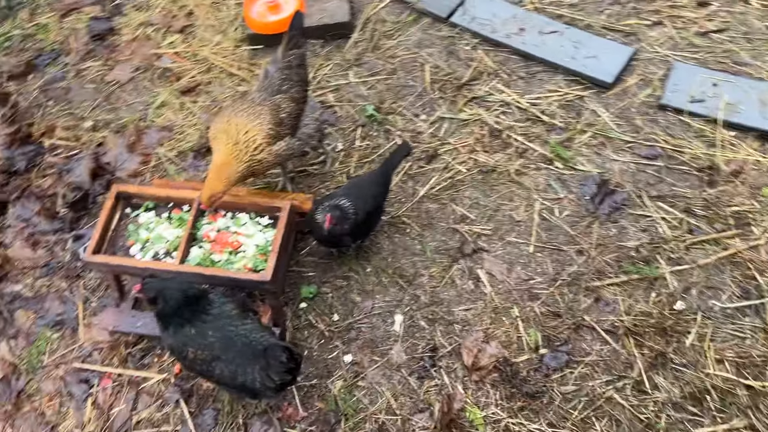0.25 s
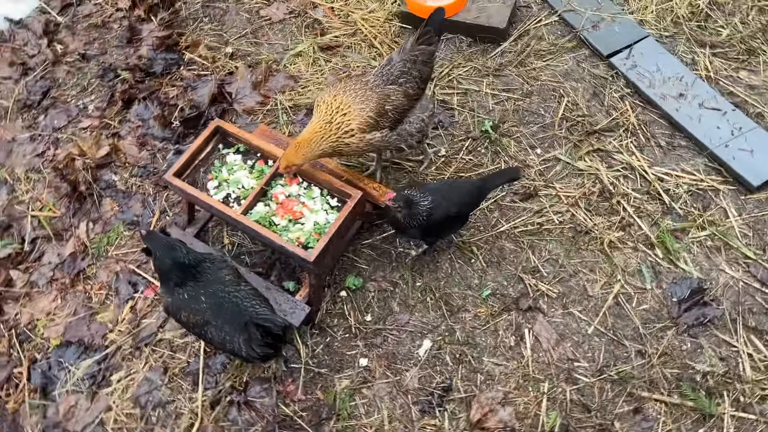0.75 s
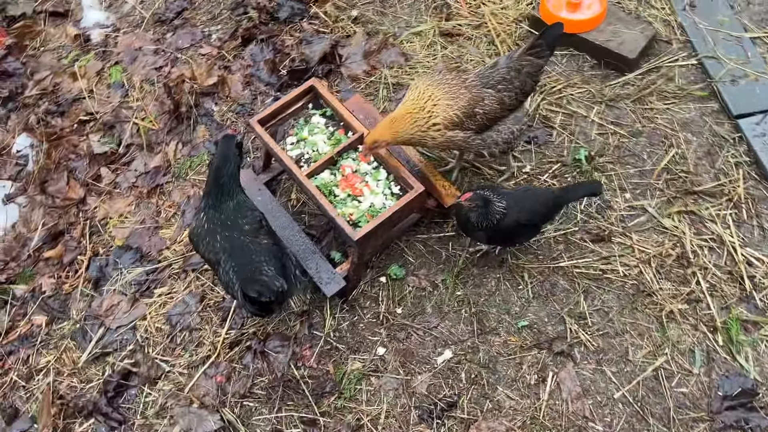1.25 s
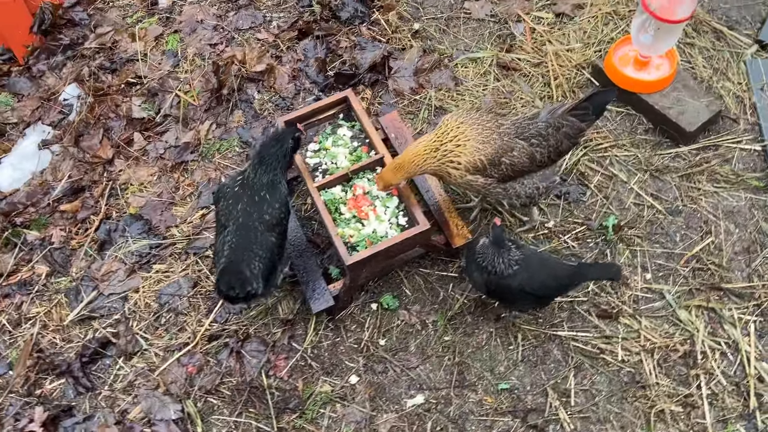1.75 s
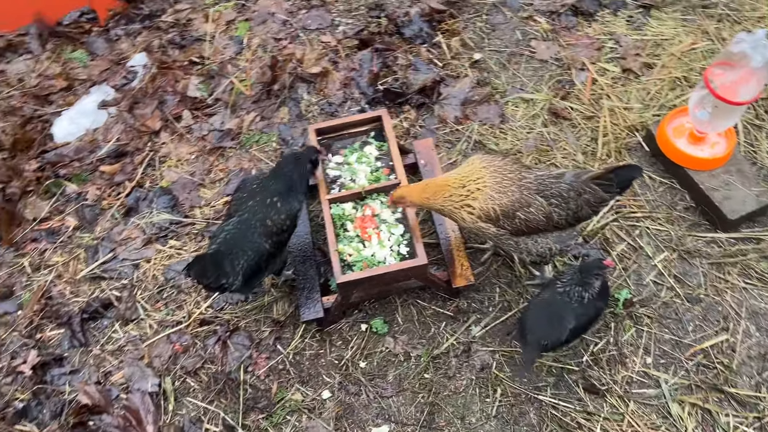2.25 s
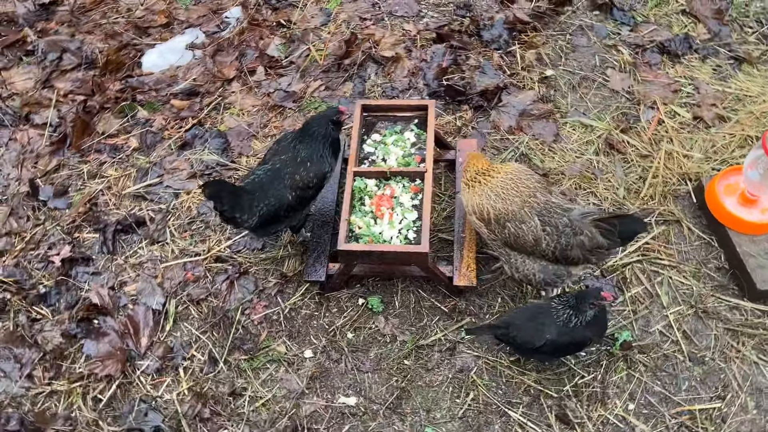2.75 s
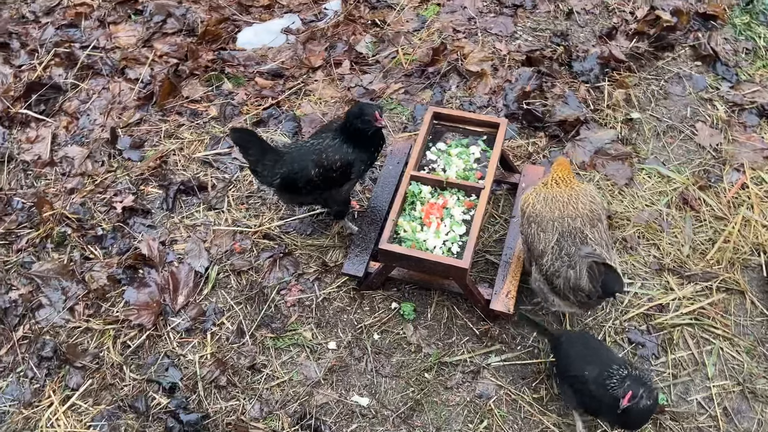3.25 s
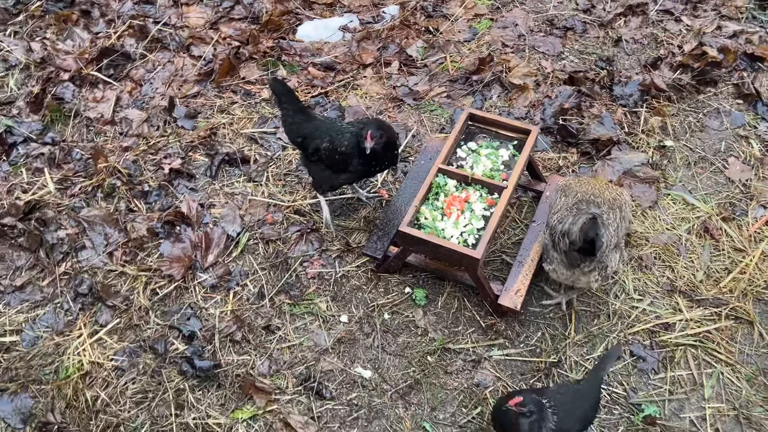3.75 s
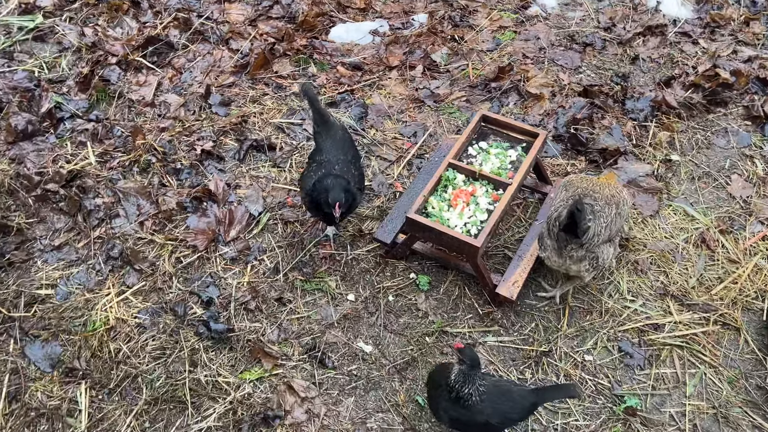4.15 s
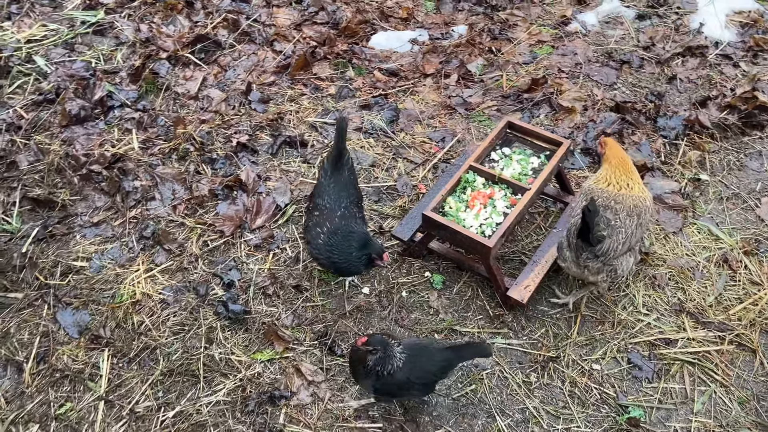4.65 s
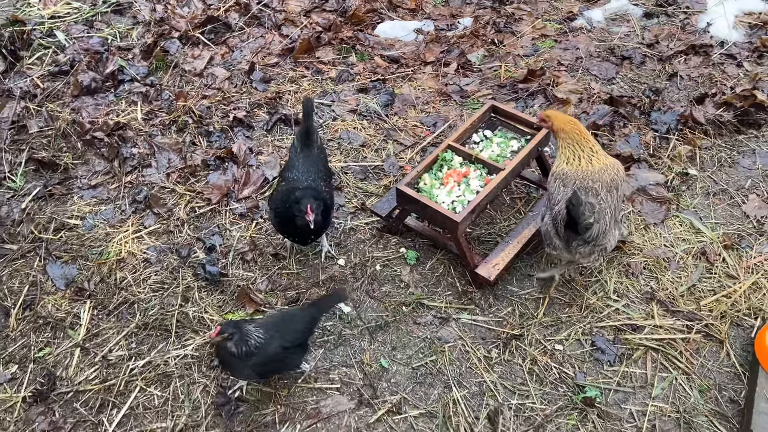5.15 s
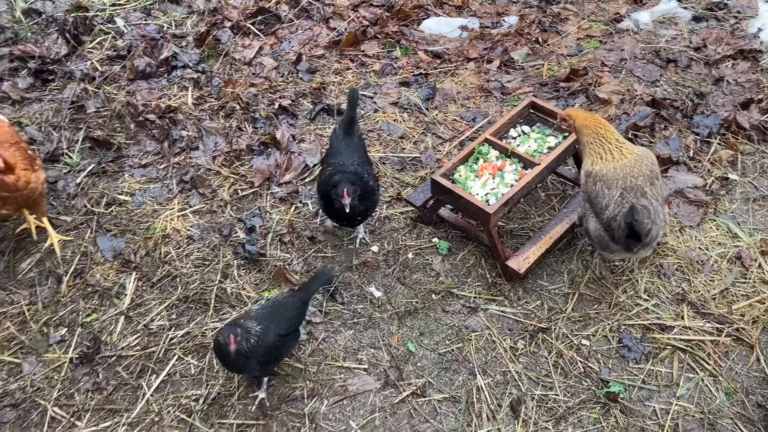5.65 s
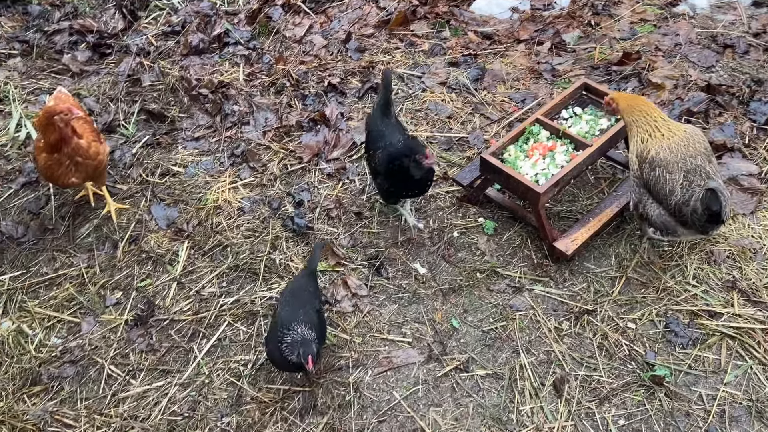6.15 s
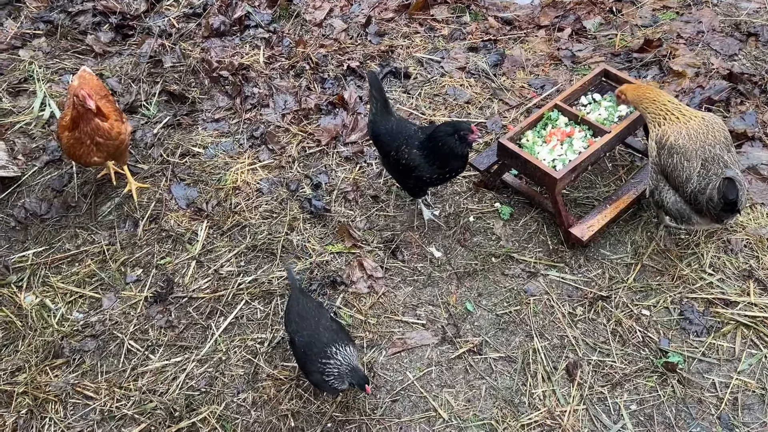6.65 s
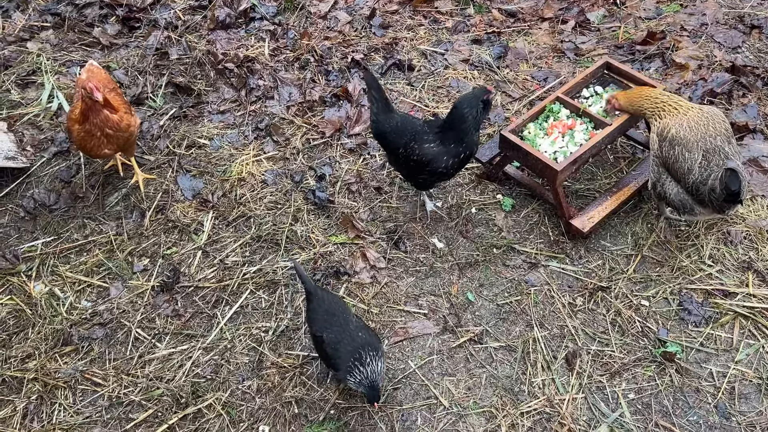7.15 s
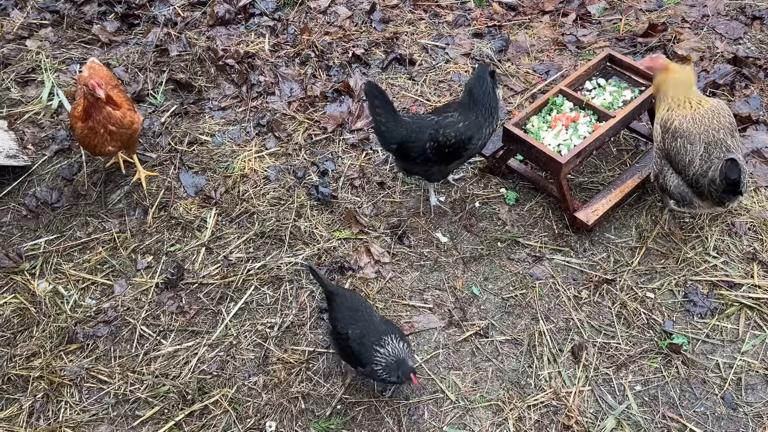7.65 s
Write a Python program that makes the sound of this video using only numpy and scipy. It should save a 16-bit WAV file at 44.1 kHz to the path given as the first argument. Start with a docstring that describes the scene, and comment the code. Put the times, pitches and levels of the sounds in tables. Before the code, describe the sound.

Open yard, close hand-held stereo microphone, almost no echo; a low, slightly unsteady rumble and soft wash run throughout. Faint straw ticks and foot pats come first. At 0.9 s a hen gives a low rising caw that flips into a thin, high whine, cracking early, climbing and stopping at 1.9; a sharp wooden beak knock lands at 1.0. A straw tick at 1.5 and a foot pat at 2.1 precede a pause. Around 3.5 comes a dull thump with pats and a brief rustle. At 4.3 a hoarse caw leads to a faint, rough whine with a soft distant moan, swelling from 4.9 to 5.8 with quick pitch breaks. Muffled gusts bump from 5.4 to 6.6. Caws at 6.1 burst into the loudest, snarling, cracking whine until 6.9. More gusts accompany a low, rising drawl from 7.4 to 7.9, with a tiny high peep at the end.

```python
"""Hens squawk at a feeder in an open yard, close to a hand-held microphone with two ports.
A squawk starts as low caws, most of them rising, and breaks into a thin, high whine whose pitch keeps cracking;
the last stays low, a long drawl. Each voice is a vibrating membrane: harmonics, half-way lines and rasp.
A beak knocks on the feeder (dying modes), feet pat, straw ticks and rustles (shaped noise puffs). One dull thump,
then gusts on the microphone (low noise swells) stand over a low outdoor rumble (coloured noise and a drone)."""
import sys
import numpy as np
from scipy import signal
from scipy.fft import rfft, irfft, next_fast_len
from scipy.io import wavfile

SR = 44100
rng = np.random.default_rng(int(sys.argv[2]) if len(sys.argv) > 2 else 0)


def unload_audio(sound):
    """Save the sound as a 16-bit wav file, at the path given as the first command line argument."""
    columns = np.transpose(np.atleast_2d(sound))
    # keep every value between -1 and 1, then stretch to whole-number steps
    steps = np.round(np.clip(columns, -1, 1) * 32767)
    wavfile.write(sys.argv[1], SR, steps.astype(np.int16))


N = 347949  # length in samples


def amp(db):
    """Decibels to gain."""
    return 10 ** (np.asarray(db) / 20)


def evened(x):
    """Scales to rms 1."""
    return x / np.sqrt(np.mean(x ** 2) + 1e-20)


def read(points, hz):
    """Reads a spectrum on a log-frequency axis."""
    f, value = np.transpose(points)
    return np.interp(np.log(hz + 1), np.log(f + 1), value)


def shaped(x, gain):
    """Filters x by a gain that is a function of frequency."""
    size = next_fast_len(x.shape[-1] + 2048)
    spectrum = rfft(x, size) * gain(np.fft.rfftfreq(size, 1 / SR))
    return irfft(spectrum, size)[..., :x.shape[-1]]


def coloured(points, size):
    """Noise of rms 1 with the given spectrum."""
    return evened(shaped(rng.standard_normal(size), lambda f: amp(read(points, f))))


def wobble(hz, size):
    """Random motion of rms 1, mostly slower than hz."""
    return evened(shaped(rng.standard_normal(size), lambda f: 1 / (1 + (f / hz) ** 4)))


def add(mix, s, sound):
    """Mixes a sound in at time s."""
    part = mix[max(round(s * SR), 0):][:len(sound)]
    part += sound[:len(part)]


def controls(rows):
    """Time and the columns of a call, sample by sample."""
    s, *columns = np.transpose(rows)
    t = np.arange(s[0], s[-1], 1 / SR)
    return t, *(np.interp(t, s, column) for column in columns)


def spell(t, middle, half_length, edge=3):
    """A brief, flat-topped swell from 0 to 1 and back; a higher edge is squarer."""
    return np.exp(-np.minimum(abs((t - middle) / half_length), 10) ** edge)


# spectrum of the outdoor noise: (frequency [Hz], relative density [dB per Hz])
AIR_COLOUR = [(30, -19), (52, -4), (66, 0), (85, -4), (125, -10), (200, -19.5), (400, -25), (750, -19),
              (1400, -25.5), (2200, -33), (5000, -37), (8500, -48), (15500, -54)]
# slow course of the outdoor noise: (time [s], level [dB])
AIR_LEVEL = [(0, -41), (5.6, -41), (6, -43), (6.8, -40.5), (7.1, -43.5), (7.5, -41)]
# likeness of the outdoor noise in the two ports: (frequency [Hz], likeness [0-1])
AIR_LIKENESS = [(60, .85), (700, .8), (5000, .6), (9000, .95)]


def air():
    """Far rumble, a soft wash and an unsteady 60 Hz drone; how alike the ports are depends on frequency."""
    def same(f):
        return np.clip(read(AIR_LIKENESS, f), 0, 1)

    mid = shaped(coloured(AIR_COLOUR, N), lambda f: np.sqrt((1 + same(f)) / 2))
    side = shaped(coloured(AIR_COLOUR, N), lambda f: np.sqrt((1 - same(f)) / 2))
    drone_hz = 60.0 + 3.4 * wobble(7.5, N)
    drone = amp(-25.0) * np.sin(2 * np.pi * np.cumsum(drone_hz) / SR) * (1 + 0.81 * wobble(2.5, N))
    level_db = np.interp(np.arange(N) / SR, *np.transpose(AIR_LEVEL)) + .8 * wobble(14, N)
    return np.array([mid + side + drone, mid - side + drone]) * amp(level_db)


# low thumps: one dull thump, then gusts on the microphone:
# (middle [s], half length [s], level before an 8 dB cut [dB], edge that scales the band [Hz])
LOW_THUMPS = [(3.538, 0.029, -34.5, 290), (5.482, 0.088, -19.5, 117.4), (5.646, 0.13, -24, 136),
              (5.93, 0.14, -26.5, 114), (6.04, 0.034, -19.5, 212), (6.126, 0.064, -26.5, 367),
              (6.382, 0.047, -24.5, 276), (6.474, .01, -29, 557), (6.5, 0.22, -31.5, 230),
              (7.248, 0.031, -30, 242), (7.342, 0.068, -32, 208), (7.516, 0.06, -29.5, 286),
              (7.595, 0.051, -28.5, 318)]


def low_thumps():
    """One dull thump, then gusts on the microphone: swells of low noise in a band scaled by each edge."""
    out = np.zeros(N)
    for middle, half_length, db, edge_hz in LOW_THUMPS:
        size = int(2 * half_length * SR)

        def band(f):
            above_bottom = f ** 4 / (f ** 4 + (.33 * edge_hz) ** 4)
            return above_bottom / (1 + (f / (.75 * edge_hz)) ** 3)

        swell = shaped(rng.standard_normal(size), band)
        add(out, middle - half_length, amp(db - 8.0) * evened(swell * np.hanning(size)))
    return out


# soft clean notes, one curve each, a low moan and a thin peep: (time [s], pitch [Hz], level [dB])
FAR_NOTES = [
    [(4.48, 431, -55), (4.6, 455, -48.5), (4.78, 430, -49.5)],
    [(7.795, 6000, -46), (7.85, 5010, -59), (7.889, 4670, -40)],
]


def notes():
    """Quiet, nearly pure tones from farther off: sines with a slightly unsteady pitch."""
    out = np.zeros(N)
    for rows in FAR_NOTES:
        t, hz, db = controls(rows)
        phase = 2 * np.pi * np.cumsum(hz * (1 + 0.0022 * wobble(60, len(t)))) / SR
        add(out, t[0], amp(db) * evened(np.sin(phase)) * signal.windows.tukey(len(t), .2))
    return out


# litter rustling under a step: (middle [s], half length [s], level [dB], centre [Hz], width [octaves])
RUSTLES = [(3.56, .045, -50, 1900, .25), (4.79, .12, -58, 5200, .55)]
RUSTLE_GRAINS_PER_S = 2500


def rustles():
    """Straw and leaves: many tiny snaps crowd together as a foot presses the litter."""
    out = np.zeros(N)
    for middle, half_length, db, centre_hz, octaves in RUSTLES:
        size = int(2 * half_length * SR)
        snaps = rng.standard_normal(size) * (rng.random(size) < RUSTLE_GRAINS_PER_S / SR)
        crackle = shaped(snaps, lambda f: np.exp(-.5 * (np.log2((f + 1) / centre_hz) / octaves) ** 2))
        add(out, middle - half_length, amp(db) * evened(crackle) * np.hanning(size))
    return out


# clear straw ticks: (time [s], peak level [dB])
CLEAR_TICKS = [(0.154, -43), (1.517, -29), (3.596, -37), (7.053, -38)]
# spectrum of a tick: (frequency [Hz], level [dB])
TICK_COLOUR = [(300, -20), (2000, -3), (6000, 0), (15000, -3)]


def straw():
    """Stalks snap under the hens' feet: a few clear ticks among many tiny ones."""
    out, t = np.zeros(N), np.arange(SR // 30) / SR
    tiny = [(place * N / SR, -58 + 12 * u ** 2) for place, u in rng.random(size=(90, 2))]
    for s, db in list(CLEAR_TICKS) + tiny:
        tick = coloured(TICK_COLOUR, len(t)) * np.exp(-t / .0013)
        add(out, s, amp(db) * tick / abs(tick).max())
    return out


# feet patting the packed earth: (time [s], peak level [dB])
FOOT_PATS = [(0.047, -33), (2.087, -34), (3.522, -30), (3.544, -32), (3.698, -31)]
# spectrum of a pat: (frequency [Hz], level [dB])
PAT_COLOUR = [(150, -9), (650, 0), (1100, -5), (2200, -19), (6000, -38)]
PAT_DECAY_S = .006


def feet():
    """A foot comes down on the earth: a dull puff with no ring."""
    out, t = np.zeros(N), np.arange(SR // 12) / SR
    for s, db in FOOT_PATS:
        pat = coloured(PAT_COLOUR, len(t)) * np.exp(-t / PAT_DECAY_S)
        add(out, s, amp(db) * pat / abs(pat).max())
    return out


# beak blows on the feeder: (time [s], peak level [dB])
BEAK_BLOWS = [(1.0093, -8), (1.024, -26)]
# modes of the feeder: (frequency [Hz], relative level [dB], time to fall 60 dB [s])
FEEDER_MODES = [(970, -12, 0.085), (2340, -7, 0.13), (2700, -14, 0.04), (3224, 5.5, 0.054),
                (5680, 10, 0.011), (8080, 5, 0.01)]


def pecks():
    """A beak strikes the feeder: a short crunch and a few dying modes."""
    out, t = np.zeros(N), np.arange(SR // 8) / SR
    crunch_colour = [(300, -21), (2000, -4.0), (3500, -3), (6000, -9), (9000, -23.5), (15000, -20)]  # (Hz, dB)
    for s, db in BEAK_BLOWS:
        ring = sum(amp(mode_db - 60 * t / t60) * np.sin(2 * np.pi * (hz * t + rng.random()))
                   for hz, mode_db, t60 in FEEDER_MODES)
        crunch = coloured(crunch_colour, len(t)) * (np.exp(-t / .0035) + .08 * np.exp(-t / .012))
        attack = 1 - np.exp(-(t / .0008) ** 2)
        blow = (ring + 2.2 * crunch) * attack
        add(out, s, amp(db) * blow / abs(blow).max())
    return out


# spells in which strong and weak cycles alternate: (middle [s], half length [s], rise of the half-way lines [dB])
DOUBLINGS = [(4.278, .015, 24), (5.535, .035, 19), (5.682, .03, 26), (5.785, .015, 17), (6.28, .025, 13),
             (6.41, .015, 16), (7.42, .02, 14), (7.495, .06, 20), (7.85, .08, 26)]
HALF_DB, HALF_ROUGH_DB = -30, 24  # setting for a clean voice, and its rise per unit of roughness


def doubling(t, rough):
    """Setting in dB for the lines half-way between the harmonics, raised when cycles alternate."""
    rise = sum(rise_db * spell(t, s, length) for s, length, rise_db in DOUBLINGS)
    return HALF_DB + HALF_ROUGH_DB * rough + rise


EDGE_HZ = 15800  # upper band limit
FLUTTER_HZ = 55  # rate of the quick sags of tension
FRAY_HZ, FRAY_DB = 170, 5  # frayed overtones slip in phase at this rate and break up
OVERTONE_FLICKER_DB = 4  # each overtone comes and goes on its own
BURST_DB, BURSTS_PER_S = 4, 30  # rasp comes in bursts
PATCHY_DB = 6  # a fully rough voice comes and goes by up to this much


def syrinx(hz, octave_db, overtone_db, half_db, rough, throat, rasp_colour, fray, flutter, rasp_db):
    """A vibrating membrane: fundamental, octave, fraying overtones, lines half-way between, and rasp."""
    size, rough = len(hz), np.clip(rough, 0, 1)
    sag = abs(wobble(FLUTTER_HZ, size)) - np.sqrt(2 / np.pi)
    hz = hz * (1 - flutter * np.sqrt(rough) * sag + .04 * rough * wobble(520, size))
    phase = 2 * np.pi * np.cumsum(hz) / SR
    frayed = fray * (.4 + 1.5 * np.sqrt(rough))

    def partial(k, slip=0):
        start = rng.uniform(0, 2 * np.pi)
        return np.sqrt(2) * np.cos(k * phase + slip + start) * (k * hz < EDGE_HZ)

    def broken(k):
        slip = frayed * min(k / 4, 3) * wobble(FRAY_HZ, size)
        return partial(k, slip) * amp(FRAY_DB * frayed * (wobble(FLUTTER_HZ, size) - .5))

    def through(k):  # a broken partial after the throat
        return broken(k) * amp(read(throat, k * hz) + OVERTONE_FLICKER_DB * wobble(10.3, size))

    def smear():  # unequal cycles smear each overtone
        return 1 + 2.2 * rough * wobble(300, size)

    def torn(k):
        return partial(k) * wobble(.3 * hz.mean(), size) * amp(BURST_DB * wobble(BURSTS_PER_S, size))

    core = partial(1) + amp(octave_db) * broken(2) * (1 + rough * wobble(250, size))
    upper = amp(overtone_db) * sum(through(k) * smear() for k in range(3, 24))
    halves = amp(half_db + overtone_db / 2 - 3) * sum(through(k + .5) for k in range(1, 8))
    # noise fills the gaps between the harmonics
    gap_noise = sum(torn(k + .5) for k in range(1, 22))
    rasp = evened(shaped(gap_noise, lambda f: amp(read(rasp_colour, f)))) * rough * amp(rasp_db)
    shimmer_db = np.sqrt(rough) * (2.3 * wobble(130, size) - 3 * sag)
    patches_db = PATCHY_DB * rough ** 2 * np.tanh(wobble(25, size))
    fade = signal.windows.tukey(size, min(1, .012 * SR / size))
    return (core + upper + halves + rasp) * amp(shimmer_db + patches_db) * fade


# colour of the overtones in a caw: (frequency [Hz], gain [dB])
CAW_THROAT = [(1050, 7), (1300, 24), (1900, 17), (2450, 9), (2900, -20), (3300, 4.5), (4800, 8.5),
              (7000, 5), (9000, -13.5), (12500, -6.5), (15500, -19)]
# noise of the unsteady membrane in a caw: (frequency [Hz], relative level [dB])
CAW_RASP = [(700, -16.5), (1350, -2), (1950, 15.5), (2300, 5), (2900, -34), (4800, -14), (8000, -32)]
CAW_FRAY, CAW_FLUTTER = .33, .025  # overtone fraying [radians], sag of tension [share of the pitch]


def caw_voice(t, hz, octave_db, overtone_db, rough, rasp_db):
    """The low register, whose octave lies on the main throat resonance."""
    return syrinx(hz, octave_db, overtone_db, doubling(t, rough), rough,
                  CAW_THROAT, CAW_RASP, CAW_FRAY, CAW_FLUTTER, rasp_db)


# the drawl: (time [s], pitch [Hz], level [dB], octave [dB], overtones [dB], roughness [0-1])
DRAWL = [(7.357, 628, -37, 7.5, -29.5, 0.14), (7.425, 686, -38, 0.5, -37, 0.42),
         (7.465, 714, -35, 0.5, -41, 0.1), (7.535, 745, -33.5, 2, -30, 0.09),
         (7.57, 797, -34.5, 11.5, -25, 0), (7.626, 802, -33, -6, -37, 0), (7.712, 799, -33, 11, -27, 0),
         (7.77, 829, -33, 1, -30.5, 0.02), (7.81, 853, -39, 7.5, -25.5, 0),
         (7.895, 892, -36.5, -5.5, -34, 0.04)]


def drawl():
    """One long call that stays in the low register."""
    out = np.zeros(N)
    t, hz, db, octave_db, overtone_db, rough = controls(DRAWL)
    add(out, t[0], amp(db) * caw_voice(t, hz, octave_db, overtone_db, rough, rasp_db=5))
    return out


# short caws: (start [s], length [s], first pitch [Hz], last pitch [Hz], mid-length level [dB],
# octave [dB], overtones [dB], roughness once clear [0-1])
CAWS = [(0.858, 0.11, 565, 737, -37, -1.5, -31.5, 0.14), (1.065, 0.036, 890, 860, -47, 6, -23, 0.07),
        (4.268, 0.17, 563, 668, -40.5, -2, -73, 0.11), (4.422, 0.049, 762, 846, -41, 4, -68, 0.24),
        (4.857, 0.06, 856, 808, -58, 14, -19.5, 0.72), (5.793, 0.017, 950, 905, -46.5, 6.5, -30, 0.8),
        (6.074, 0.04, 689, 830, -31.5, 6, -23, 0.14), (6.104, 0.047, 826, 974, -48, 11, -25, 0.64),
        (6.137, 0.078, 817, 814, -32.5, -1, -27, 0.03), (6.901, 0.039, 926, 800, -36, 8, -28.5, 0.58)]
CAW_BEND, CAW_SWELL_DB = 1.4, 4  # the pitch glides ever faster while the level swells
HOARSE, CLEAR_S = 0.18, 0.012  # extra roughness at the start of a caw, and how fast it clears


def caws():
    """Short gliding calls of the low register, hoarse at their start."""
    out = np.zeros(N)
    for start, length, first_hz, last_hz, db, octave_db, overtone_db, rough in CAWS:
        t = np.arange(0, length, 1 / SR)
        hz = first_hz + (last_hz - first_hz) * (t / length) ** CAW_BEND
        rough = rough + HOARSE * np.exp(-t / CLEAR_S)
        level_db = db + CAW_SWELL_DB * (t / length - .5)
        voice = caw_voice(start + t, hz, octave_db, overtone_db, rough, rasp_db=-5.5)
        add(out, start, amp(level_db) * voice)
    return out


# sidebands lie this share of the pitch above and below the whine, and drift by a share at a rate
SNARL_SHARE, SNARL_DRIFT, SNARL_DRIFT_HZ = .33, .07, 110
SKIRT_HZ = 190  # width of the noisy skirt that clings to the whine itself
SNARL_UPPER_DB, SNARL_LOWER_DB, SKIRT_DB = -15, -26, -8.5  # relative levels within the snarl


def snarl(hz):
    """A second vibration: unsteady sidebands and a noisy skirt around a tone of pitch hz."""
    size = len(hz)

    def tone(f, turn=0):
        return np.sqrt(2) * np.cos(2 * np.pi * np.cumsum(f) / SR + turn)

    gap = hz * (SNARL_SHARE + SNARL_DRIFT * wobble(SNARL_DRIFT_HZ, size))
    skirt = evened(tone(hz) * wobble(SKIRT_HZ, size) + tone(hz, np.pi / 2) * wobble(SKIRT_HZ, size))
    sidebands = amp(SNARL_UPPER_DB) * tone(hz + gap) + amp(SNARL_LOWER_DB) * tone(hz - gap)
    return sidebands + amp(SKIRT_DB) * skirt


# whines outside their cracks, one curve each: (time [s], pitch [Hz], level [dB], roughness [0-1])
WHINES = [
    [(0.966, 1183, -29.5, 0.25), (1.16, 1192, -29.5, 0.3), (1.22, 1155, -30.5, 0.25),
     (1.46, 1310, -25, 0.2), (1.55, 1241, -25.5, 0.22), (1.71, 1384, -27.5, 0.16),
     (1.825, 1395, -25.5, 0.01), (1.835, 1526, -26, 0.27), (1.845, 1500, -25.5, 0.3),
     (1.862, 1295, -37, 0.5)],
    [(4.47, 1117, -50, 0.15), (4.54, 1130, -41.5, 0), (4.61, 1247, -50.5, 0.5), (4.67, 1212, -46.5, 0.12),
     (4.75, 1268, -47, 0.62), (4.86, 1296, -50, 0.39), (4.96, 1348, -35, 0.09), (5.41, 1393, -31.5, 0.13),
     (5.72, 1456, -29, 0.11), (5.775, 1417, -23, 0.12), (5.803, 1308, -35, 0)],
    [(6.213, 1452, -33, 0.78), (6.232, 1093, -34, 0.06), (6.256, 1162, -30, 0.12),
     (6.26, 1333, -25.5, 0.14), (6.36, 1353, -24, 0.08), (6.395, 1440, -26.5, 0.15),
     (6.46, 1452, -23.5, 0.06), (6.81, 1500, -23.5, 0.1), (6.876, 1517, -20.5, 0.01),
     (6.88, 1293, -29, 0.15), (6.91, 1092, -27.5, 0.4)],
]
# voice of each whine at its usual level: (octave [dB], overtones [dB], rasp at full roughness [dB],
# fraying of the overtones [radians])
WHINE_VOICES = [(-28, -32, -21, .5), (-7, -5, 1, .7), (-23, -25, .5, 1.05)]
# cracks of the whine: (middle [s], half length [s], drop in pitch [Hz], change of level [dB])
CRACKS = [(1.008, 0.024, 196, -15.5), (1.076, 0.026, 229.8, -20), (1.134, 0.012, 190.6, -13.5),
          (1.175, 0.0058, 167, -7.5), (1.204, 0.0087, 100.6, -5.5), (1.544, 0.0051, 40.4, -6.5),
          (4.502, 0.028, 48.8, 4.5), (4.672, 0.022, 45.8, 7), (4.8, 0.0089, 80, 6.5),
          (4.944, 0.0052, 159, -2), (5.022, 0.0068, 207, -4.5), (5.236, 0.0094, 194, -0.5),
          (5.334, .008, 108.6, -2.5), (5.369, 0.0055, 155, -1.5), (5.734, 0.0048, 168.4, 0),
          (5.751, 0.0028, 188.3, -2), (6.31, 0.004, 130, -1.5), (6.362, 0.0048, 198, -3.5),
          (6.382, 0.0092, 194, -0.5), (6.433, 0.0071, 157, -2.5), (6.509, 0.008, 158, -2.5),
          (6.524, 0.0065, 243.5, -3.5), (6.603, 0.0044, 170, -5.5), (6.652, 0.0046, 192.2, -5),
          (6.734, 0.0052, 196, -5), (6.779, 0.0045, 252.5, -3), (6.818, 0.0024, 128, -11)]
# spells when the whine turns harsh: (middle [s], half length [s], gain of the snarl re the whine [dB])
SNARLS = [(5.68, .09, -7), (6.28, .025, 0), (6.411, .016, 2), (6.557, .027, -5), (6.68, .02, -1),
          (6.817, .018, -3), (6.895, .016, 0)]
# colour of the overtones with the beak shut, open and half open: (frequency [Hz], gain [dB])
SHUT_THROAT = [(2400, -6), (3800, 5), (4300, -5), (5700, -14), (7000, -14), (8500, -29)]
OPEN_THROAT = [(2200, -5), (3500, -5), (4200, -13.5), (4900, -14), (5500, -20), (6900, -14), (8300, -27),
               (11000, -41)]
HALF_THROAT = [(1900, 16), (2400, -11), (3500, -5), (4400, -1), (5100, -6), (6000, -19), (7000, -16),
               (8500, -30)]
# noise of the unsteady membrane, beak shut or half open, and open: (frequency [Hz], relative level [dB])
SHUT_RASP = [(800, -17), (1400, -9), (1850, -1), (2400, -1), (3200, -2), (4000, -10), (4800, -4),
             (6000, -16), (8000, -20), (15500, -35)]
OPEN_RASP = [(800, -12), (2100, 6.5), (4200, -6), (5200, -10), (6600, 1.5), (8200, -23), (15500, -31)]
USUAL_DB, PURER_DB_PER_DB = -24, 0.43  # a whine louder than usual is purer
MELLOW_DB = -31  # below this level a whine loses high overtones and rasp
FAINT_DB = -40  # below this level its octave gains no further
CRACK_EDGE = 6  # the pitch jumps rather than glides: the higher, the squarer each crack
CRACK_ROUGH, CRACK_OCTAVE_DB = .05, 3  # extra roughness; the octave sinks into a throat resonance
WHINE_FLUTTER = .075  # quick sags of tension as a share of the pitch
SNARL_REST_DB = -17  # a trace of the snarl never leaves a loud whine


def whines():
    """The high register, nearly a whistle; it jumps in pitch and level at each crack and sometimes snarls."""
    out = np.zeros(N)
    beaks = [(SHUT_THROAT, SHUT_RASP), (OPEN_THROAT, OPEN_RASP), (HALF_THROAT, SHUT_RASP)]
    for rows, voice_settings, (throat, rasp_colour) in zip(WHINES, WHINE_VOICES, beaks):
        octave_db, overtone_db, rasp_db, fray = voice_settings
        t, hz, db, rough = controls(rows)
        # loudness sets the purity before any crack changes the level
        purer_db = PURER_DB_PER_DB * (np.maximum(db, FAINT_DB) - USUAL_DB)
        mellow_db = np.maximum(MELLOW_DB - db, 0)
        for s, length, drop_hz, change_db in CRACKS:
            crack = spell(t, s, length, CRACK_EDGE)
            hz = hz - drop_hz * crack
            db = db + change_db * crack
            rough = rough + CRACK_ROUGH * crack
            octave_db = octave_db + CRACK_OCTAVE_DB * crack
        voice = syrinx(hz, octave_db - purer_db, overtone_db - purer_db - 1.25 * mellow_db,
                       doubling(t, rough) + rasp_db / 2, rough,
                       throat, rasp_colour, fray, WHINE_FLUTTER, rasp_db - mellow_db / 3)
        trace = amp(SNARL_REST_DB + np.minimum(purer_db, 0))
        harsh = trace + sum(amp(snarl_db) * spell(t, s, length) for s, length, snarl_db in SNARLS)
        add(out, t[0], amp(db) * (voice + harsh * snarl(hz)))
    return out


def placed(x, right_db, lag_ms):
    """A source reaches the two ports with different delay and, in the lower range, different level."""
    left, right = np.broadcast_to(x, (2, N))

    def lean(f):
        return amp(right_db / 2 / (1 + (f / 2300) ** 4))

    def delay(f):
        return np.exp(-2j * np.pi * f * lag_ms / 1000)

    return np.array([shaped(left, lambda f: delay(f) / lean(f)), shaped(right, lean)])


def yard(x, wet_db, t60):
    """Faint scatter from the ground, fence and trees: sparse random echoes that die away."""
    t = np.arange(SR // 2) / SR
    sparse = rng.standard_normal((2, len(t))) * (rng.random((2, len(t))) < .05)
    taps = sparse * amp(-60 * t / t60) * (t > .004)
    return amp(wet_db) * signal.fftconvolve(x[None], taps / np.linalg.norm(taps[0]), axes=1)[:, :N]


# where each source stands to the two ports: (right louder at low frequency [dB], left later [ms])
PORT_GAP = dict(caw=(3, .08), whine=(5, .01), peck=(0, .02), air=(1, 0))


def scene():
    """Hens and feeder in the open yard."""
    outdoors = placed(air(), *PORT_GAP["air"])
    # the thumps differ slightly between the ports
    thumps = low_thumps() + np.array([[.2], [-.2]]) * low_thumps()
    litter = straw() + rustles() + feet()
    knocks, low, high = pecks(), caws() + drawl(), whines()
    near = placed(low, *PORT_GAP["caw"]) + placed(high, *PORT_GAP["whine"]) + placed(knocks, *PORT_GAP["peck"])
    scatter = yard(low + high + knocks, wet_db=-24, t60=.25)
    return outdoors + thumps + notes() + litter + scatter + near


# the right port is duller: (frequency [Hz], gain [dB])
RIGHT_SHADOW = [(3200, 0), (4200, -6), (5600, -14), (6800, -9), (8300, 0)]
# phase by which the left port leads, for every source: (frequency [Hz], phase [radians])
LEFT_LEAD = [(200, 0), (800, .8), (1550, 1.8), (2200, 2.35), (3200, 3), (4100, 6.5), (7800, 6.0),
             (9100, 3.4), (11200, 3), (12100, 0)]


def record(dry):
    """The right port lags and loses some treble; the microphone drops the deepest bass; then the band limit."""
    right = shaped(dry[1], lambda f: amp(read(RIGHT_SHADOW, f)) * np.exp(-1j * read(LEFT_LEAD, f)))
    ports = shaped(np.array([dry[0], right]), lambda f: f ** 4 / (f ** 4 + 36 ** 4))
    band_limit = signal.firwin(511, EDGE_HZ, window=("kaiser", 9), fs=SR)
    return signal.oaconvolve(ports, band_limit[None], "same")


dry = scene()
out = record(dry)
unload_audio(out)
```